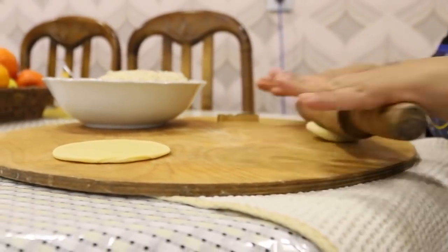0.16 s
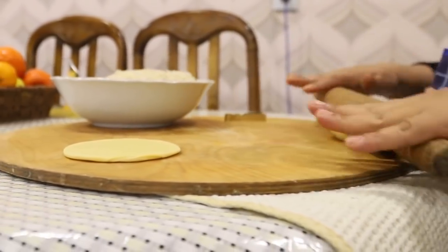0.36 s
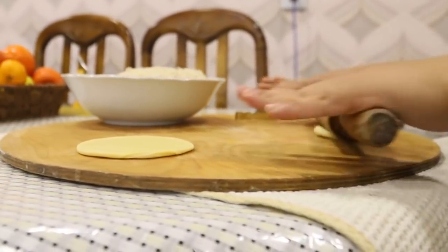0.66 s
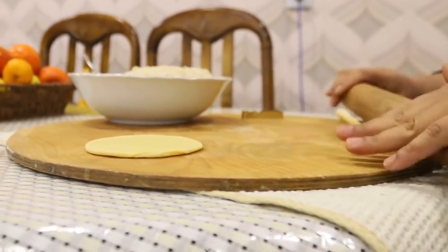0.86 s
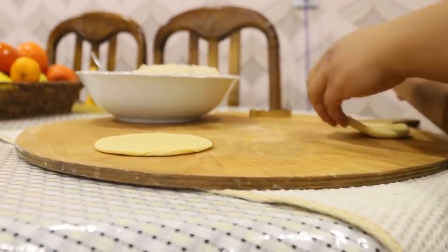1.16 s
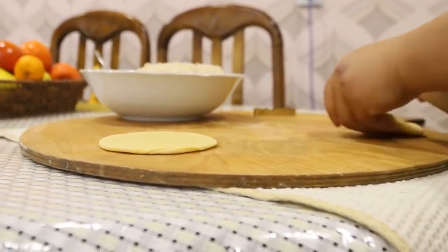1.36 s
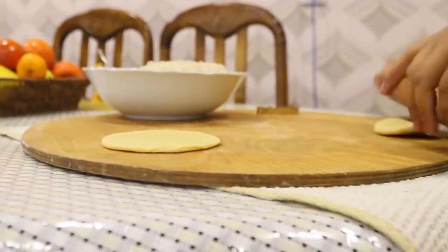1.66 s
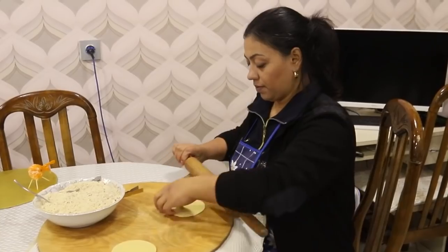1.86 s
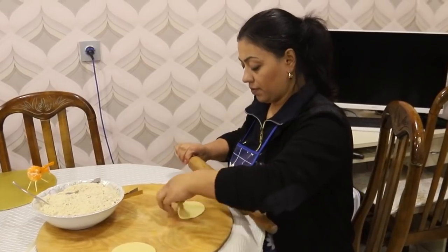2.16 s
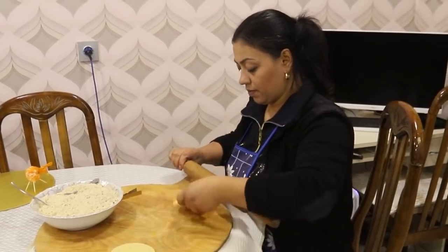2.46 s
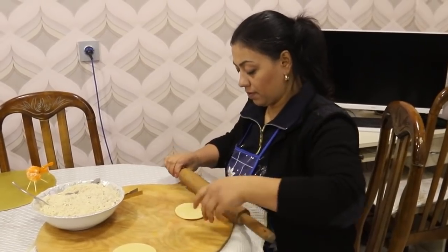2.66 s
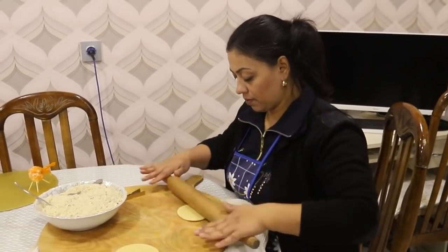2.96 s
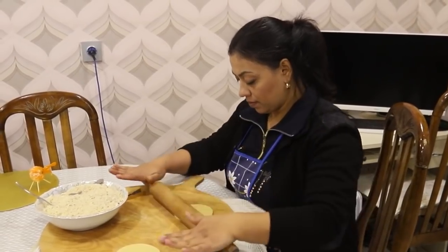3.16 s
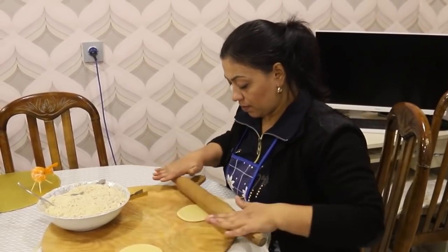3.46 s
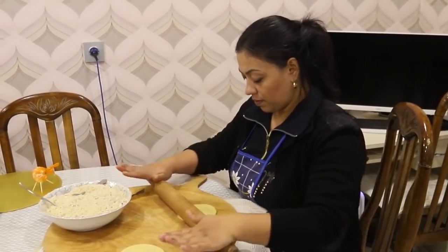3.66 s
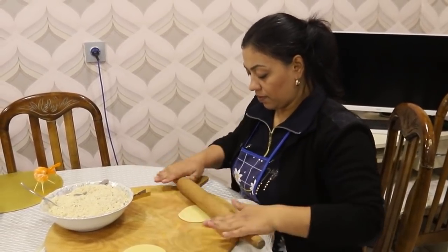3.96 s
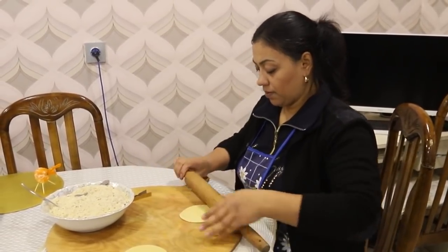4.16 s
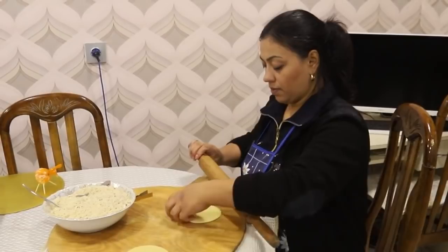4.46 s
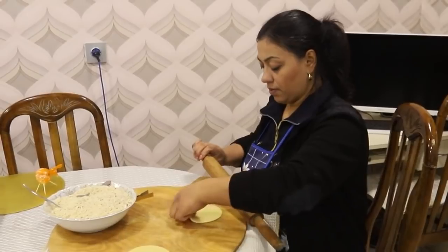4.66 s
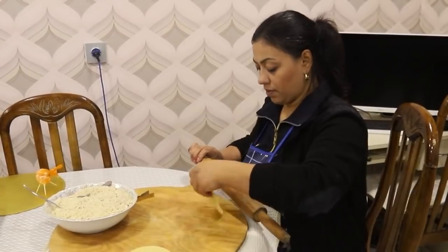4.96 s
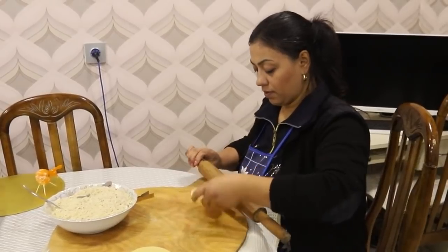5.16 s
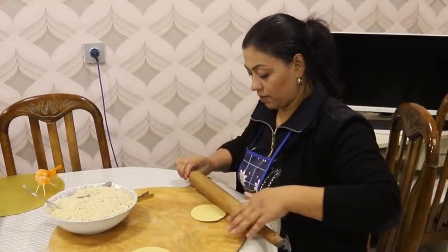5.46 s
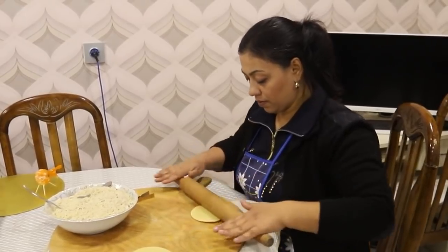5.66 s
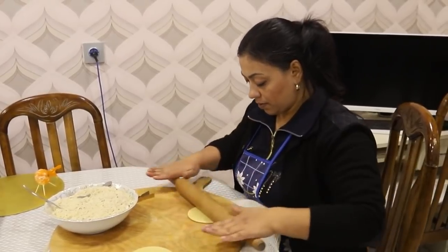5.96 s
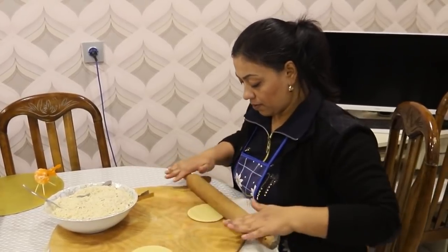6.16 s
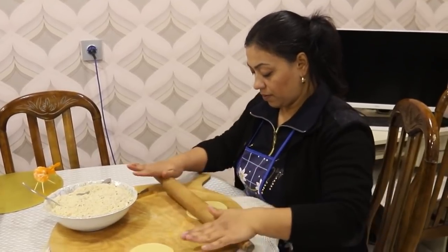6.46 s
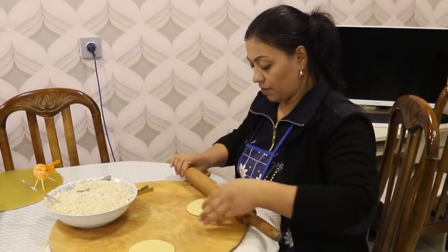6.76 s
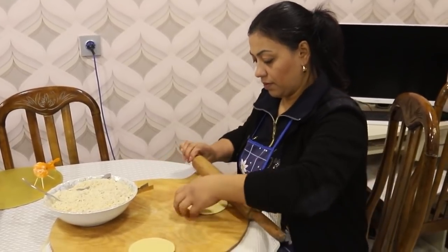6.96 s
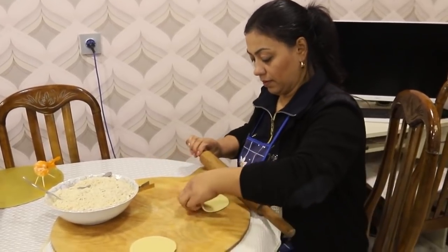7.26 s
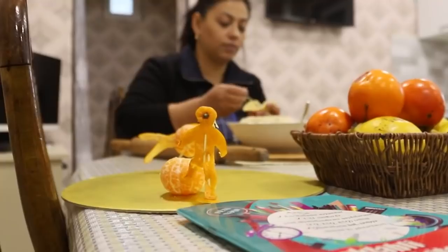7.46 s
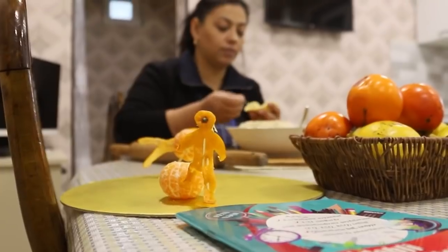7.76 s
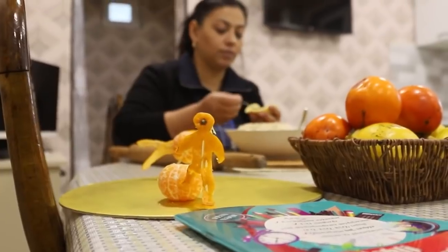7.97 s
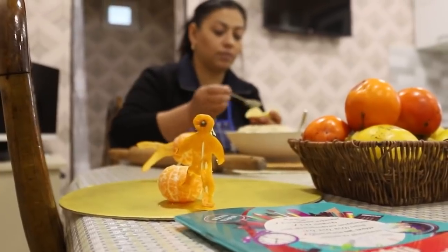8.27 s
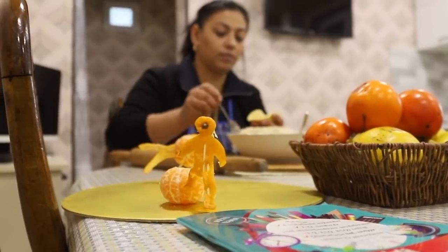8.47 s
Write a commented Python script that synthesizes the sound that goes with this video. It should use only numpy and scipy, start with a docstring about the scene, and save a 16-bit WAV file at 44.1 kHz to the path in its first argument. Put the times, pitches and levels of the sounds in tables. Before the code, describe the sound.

Quiet room tone with a faint wavering appliance hum and a thin, very high whine opens the sound. Close to a wooden board, a rolling pin gives hard, short woody clacks at about 0.6, 0.7, 0.9 and 1.1 s, the stronger ones touching off a faint high crockery ring. A tiny dropout falls near 1.75 s; then the microphone is further off in a small live room with a short reverberation. Soft floury slides come at 2 s, a quick double knock at 2.6, another at 2.85, then scuffs and dry ticks around 3 to 3.3. Knocks follow at 4.3, fainter at 4.75, a rapid pair at 5.35, then 5.6, 6.3 and a strong one at 6.9. Dry bright rustles brush by at 4.3 and 7.2, with gritty slides near 7. After another brief dropout at 7.5, only a very faint thump, small light ticks, hum and a low soft rumble near 8 remain until about 8.7 s.

```python
"""A faint hum and a thin whine over room tone are heard first; then a wooden rolling pin knocks on a round board.
The board lies on a cloth-covered table in a small, live dining room: each blow excites damped modes and a crack.
Crockery rings in its modes; dry rustles are dense small clicks in broad bands; slides on flour are friction noise,
with a low rumble near 8 s. Light dry ticks are short rings with a snap. The listening point starts by the board
and later stands further off, where a near wall returns each knock once. The sound drops out briefly twice."""
import sys
import numpy as np
from scipy import signal
from scipy.fft import rfft, irfft, next_fast_len
from scipy.io import wavfile
from scipy.ndimage import uniform_filter1d

SR = 44100
rng = np.random.default_rng(int(sys.argv[2]) if len(sys.argv) > 2 else 0)


def store_wav(level_fs):
    """Save 16-bit WAV to argv[1]."""
    pcm = np.round(np.clip(np.atleast_2d(level_fs), -1, 1) * 32767)
    wavfile.write(sys.argv[1], SR, pcm.T.astype(np.int16))


N = 379789
OPPOSED = np.array([[1], [-1]])  # a side signal enters left and right with opposite signs
SOFT_MS = 0.4  # rise time of short noise bursts
CLOSE_UNTIL_S = 1.75  # the listening point is by the board, later further off


def undb(db):
    """Decibel law: the amplitude ratio of a level."""
    return 10 ** (np.asarray(db) / 20)


def level(x, db):
    """Root-mean-square scaling: bring a signal to a level in dB."""
    return x * undb(db) / np.sqrt(np.mean(x ** 2))


def coloured(gain, size):
    """Spectral shaping: white noise filtered by gain(f/Hz)."""
    fast = next_fast_len(size)
    hz = np.maximum(np.arange(fast // 2 + 1) * SR / fast, 1)
    return irfft(rfft(rng.standard_normal(fast)) * gain(hz), fast)[:size]


def bump(centre_hz, octaves):
    """Constant relative bandwidth: a bell-shaped band on a log-frequency axis."""
    return lambda hz: np.exp(-0.5 * (np.log2(hz / centre_hz) / octaves) ** 2)


def walk(rate):
    """Slow random modulation: random levels held 1 / rate s and smoothed twice."""
    hold = int(SR / rate)
    steps = np.repeat(rng.standard_normal(N // hold + 1), hold)
    return uniform_filter1d(uniform_filter1d(steps, hold), hold)[:N]


def decay(t, t60):
    """Exponential decay: the amplitude falls 60 dB in t60 seconds."""
    return undb(-60 * t / t60)


def add(out, x, s, pan_db=0):
    """Superposition: add a sound at s seconds, the left louder than the right by pan_db."""
    start = int(s * SR)
    x = x[..., :N - start]
    out[:, start:start + x.shape[-1]] += x * undb(OPPOSED * pan_db / 2)


def ring(modes, lift_db=0):
    """Modal vibration: damped modes, one row each; every blow lands elsewhere, so strength and pitch vary."""
    hz, db, t60 = np.transpose(modes)[:, :, None]
    t = np.arange(SR // 3) / SR
    strength, detune = rng.standard_normal((2, len(modes), 1))
    scatter_db, scatter_pitch = 1.5, 0.015
    envelope = undb(db + lift_db + scatter_db * strength) * decay(t, t60)
    return envelope * np.sin(2 * np.pi * hz * (1 + scatter_pitch * detune) * t)


def clatter(crack_db):
    """Granular noise: a knock shakes loose grain and flour, a burst set relative to the crack."""
    t = np.arange(SR // 10) / SR
    grains = level(coloured(bump(1900, 0.72), len(t)), crack_db - 47)
    return grains * decay(t, 0.034) * np.minimum(t * 1000 / SOFT_MS, 1) ** 2


# pin meets board in two close pulses: (t/s, direct peak level/dB, first against second/dB, second late/ms,
# contact time constant/ms, crack level/dB, wood tilt/dB per octave, favoured f/Hz, table thud level/dB)
KNOCKS = [(0.588, -4.5, 5, 5.2, 0.064, 26.5, -1.5, 880, -26),
          (0.7273, -18.5, -5.5, 4.1, 0.074, 14, -1, 323, -16.5),
          (0.9274, -3, -8.5, 2.15, 0.065, 24.5, 4, 770, -20),
          (1.105, -6.5, -21, 1.9, 0.084, 26.5, 4, 845, -15),
          (1.769, -26.5, 1, 1.54, 0.17, 20, 3.5, 530, -15),
          (2.6175, -15, 8, 2.3, 0.029, 40, 5.5, 1680, -20),
          (2.649, -24, 22, 2.8, 0.059, 14, 3.5, 1470, -28),
          (2.847, -13.5, -6.5, 1.68, 0.052, 31.5, 2, 640, -6.5),
          (3.4782, -28, -4, 4.2, 0.13, 21, -3, 402, -3), (4.261, -10, -4, 1.75, 0.059, 32, 3, 610, -9.5),
          (4.7505, -30, 8, 1.9, 0.13, 27, -1.5, 302, 0), (5.3425, -21.5, -6, 2.3, 0.011, 39, 4, 1480, -31),
          (5.3555, -16, 1.5, 3.3, 0.015, 33.5, 2, 640, -32),
          (5.574, -12, -4.5, 1.69, 0.047, 31.5, 1, 625, -5.5),
          (5.868, -41.5, -20, 3.8, 0.16, 24, 6, 280, 20),
          (6.2667, -20.5, -5, 1.53, 0.084, 18, 2.5, 665, -10),
          (6.8998, -7, -7.5, 1.63, 0.06, 39.5, 4, 590, -9), (7.507, -41.5, 15, 2.1, 0.17, 34, -6, 280, -8)]
# modes of pin and board: (f/Hz, relative level/dB, t60/s)
WOOD_MODES = [(280, 0.5, 0.019), (405, -6, 0.058), (530, 6.5, 0.01), (623, 8.5, 0.013), (781, 6, 0.028),
              (820, 7.5, 0.016), (940, -2.5, 0.039), (1186, 3, 0.014), (1370, 7.5, 0.0097),
              (1576, 3.5, 0.015), (1843, 4.5, 0.0062), (2047, 4, 0.0096), (2480, 7.5, 0.002),
              (2780, -18, 0.0031), (3100, -13, 0.0032), (3530, -6, 0.0031), (4260, -14, 0.0023)]
# modes of the table: (f/Hz, relative level/dB, t60/s)
TABLE_MODES = [(62, -19, 0.36), (89.5, -14, 0.53), (138.4, 2, 0.095), (166.3, -1, 0.12), (188, -0.5, 0.058),
               (248.4, -6, 0.16)]


def knocks():
    """Impact excitation: smooth pulses ring wood and table; a softer contact pushes longer and sounds duller.

    Returns the direct sound, and the evener blend of all directions that fills the room."""
    direct, around = np.zeros((2, 2, N))
    ms = np.arange(SR // 40) / SR * 1000
    # the pin stopping short cracks the air directly; its thickness rounds off the top
    crack_lowpass = signal.butter(3, 4470, fs=SR, output="sos")
    crack = np.gradient(signal.sosfilt(crack_lowpass, np.arange(SR // 3) == 1))
    # pairs of modes push the air in opposite ways
    signs = (-1.) ** ((np.arange(len(TABLE_MODES) + len(WOOD_MODES)) + 1) // 2)
    wood_hz = np.array(WOOD_MODES)[:, :1]
    for s, db, first_db, lag_ms, contact_ms, crack_db, tilt_db, favoured_hz, thud_db in KNOCKS:
        first_time = ms / contact_ms
        second_time = np.maximum(ms - lag_ms, 0) / contact_ms
        first = undb(first_db) * first_time ** 3 * np.exp(-first_time)
        push = first + second_time ** 3 * np.exp(-second_time)
        # the place of the blow favours the modes near one pitch
        lift_db = 3.7 * bump(favoured_hz, 0.35)(wood_hz) + tilt_db * np.log2(wood_hz / favoured_hz)
        modes = np.vstack([undb(thud_db) * ring(TABLE_MODES), ring(WOOD_MODES, lift_db)])
        loud_crack = undb(crack_db) * crack
        blow = signal.fftconvolve(-signs @ modes + loud_crack, push)
        # without the dips between modes and between the two pulses
        even_modes = modes[::2].sum(axis=0) - modes[1::2].sum(axis=0)
        even = signal.fftconvolve(even_modes + loud_crack, first * np.hypot(1, undb(-first_db)))
        grains = clatter(crack_db) * push.sum()
        blow[:len(grains)] += grains
        even[:len(grains)] += grains
        gain = undb(db) / np.abs(blow).max()
        add(direct, blow * gain, s)
        add(around, even * gain, s)
    return direct, around[0]


# modes of crockery on the table: (f/Hz, relative level/dB, t60/s)
BOWL_MODES = [(4620, 0, .16), (6050, -4, .03)]
# two hard knocks set it ringing: (t/s, level/dB)
CLINKS = [(.934, -44), (1.11, -58)]


def clinks():
    """Free vibration: crockery rings on in its own damped modes."""
    out = np.zeros((2, N))
    for s, db in CLINKS:
        add(out, undb(db) * ring(BOWL_MODES).sum(axis=0), s)
    return out


# dry, bright rustles: (t/s, swell/s, fade time constant/s, level before swell and fade/dB, tilt/dB per octave)
RUSTLES = [(4.309, 0.0081, 0.048, -38.5, -0.5), (7.226, 0.0066, 0.036, -35.5, 0.5)]
# broad bands of the rustle: (f/Hz, width/Hz, relative level/dB)
RUSTLE_BANDS = [(1680, 50, 13.5), (2900, 1800, 2), (4560, 520, -7), (7140, 1600, -10.5), (12200, 3000, -41)]


def rustles():
    """Stochastic excitation: dense, uneven small clicks fill broad bands, swell quickly and die away."""
    clicks_per_s, scatter_db = 5000, 2.5
    out, t = np.zeros(N), np.arange(SR // 3) / SR
    hz, width, band_db = np.transpose(RUSTLE_BANDS)[:, :, None]
    for s, swell, fade, db, tilt_db in RUSTLES:
        hit, size = rng.random((2, len(t)))
        strength = undb(-scatter_db * np.log(size))
        sign = np.sign(hit * SR - clicks_per_s / 2)
        clicks = (hit < clicks_per_s / SR) * strength * sign
        gain = undb(band_db + tilt_db * np.log2(hz / 2000)) * width
        bands = gain * np.exp(-np.pi * width * t) * np.sin(2 * np.pi * hz * t)
        shape = np.minimum(t / swell, 1) * np.exp(-np.maximum(t - swell, 0) / fade)
        rustle = level(signal.fftconvolve(clicks, bands.sum(axis=0))[:len(t)], db)
        start = int(s * SR)
        out[start:start + len(t)] += rustle * shape
    return out


# slides on flour and, near 8 s, a low rumble:
# (t/s, swell/s, fade time constant/s, level before swell and fade/dB, centre f/Hz)
SCUFFS = [(0.968, 0.034, 0.14, -53.5, 6100), (1.4, .05, 0.082, -59, 6200), (1.999, 0.04, 0.071, -44, 980),
          (2.15, 0.027, 0.031, -49.5, 500), (2.93, 0.065, 0.022, -38.5, 560),
          (3.115, 0.071, 0.0064, -38.5, 610), (3.498, 0.012, 0.026, -54, 232),
          (4.177, 0.046, 0.045, -47.5, 3700), (4.304, 0.011, 0.032, -43.5, 3600),
          (4.547, 0.097, 0.043, -47, 1850), (4.662, 0.014, 0.043, -44, 200), (4.89, .04, 0.28, -60, 4840),
          (5.84, 0.027, 0.024, -45, 206), (5.93, 0.03, 0.031, -54, 218), (6.591, 0.024, 0.032, -53.5, 1600),
          (6.805, 0.023, 0.064, -48, 3270), (7.046, 0.038, 0.12, -43.5, 2900),
          (7.059, 0.034, 0.09, -39, 810), (7.21, 0.011, 0.088, -47, 497), (7.899, 0.16, 0.18, -57, 65)]


def scuffs_and_rumble():
    """Band noise: gritty friction, and one low rumble, swell and then die, wider in the treble."""
    out = np.zeros((2, N))
    t = np.arange(SR * 2 // 3) / SR
    for s, swell, fade, db, hz in SCUFFS:
        shape = np.where(t < swell, (t / swell) ** 0.5, np.exp(-np.maximum(t - swell, 0) / fade))
        grit = undb(2.0 * walk(500)[:len(t)])
        octaves = 0.35 if hz < 100 else 0.83  # the rumble is a narrower band
        mid, side = (level(coloured(bump(hz, octaves), len(t)), 0) for _ in range(2))
        both = (mid + min(hz / 1440, 0.9) * side * OPPOSED) * grit
        add(out, level(both, db) * shape, s)
    return out


# light dry ticks, many at the pitches of the appliance hum:
# (t/s, ring level/dB, f/Hz, treble snap relative level/dB)
TICKS = [(.442, -46, 2940, -16), (1.428, -48, 1920, -20), (2.906, -48, 3450, -3), (3.0008, -37.5, 730, -6),
         (3.073, -37.5, 960, -7), (3.1785, -39, 780, 0), (3.2007, -45.5, 2440, -20),
         (3.3039, -45.5, 2340, -20), (4.3115, -49, 4530, -1), (4.906, -52, 4600, -15),
         (5.163, -50, 2450, -10), (5.2455, -57, 2370, -15), (5.684, -46, 3070, -10),
         (7.655, -43, 1350, -20), (7.713, -44, 1380, -12), (7.908, -64, 2700, -20), (8.04, -57, 2430, -22),
         (8.404, -51, 1350, -15), (7.6873, -47, 2700, -20), (7.7552, -45, 2430, -17),
         (7.7844, -46, 2700, -20), (7.8466, -44, 2730, -15), (8.0796, -49, 2700, -18),
         (8.112, -47, 2640, -15), (8.185, -51, 2430, -18), (8.572, -47, 2280, -20)]
# faint ticks ring at one of these: f/Hz
FAINT_HZ = [1340, 1350, 2430, 2700]


def ticks():
    """Transient radiation: a short damped ring with a wider snap; faint ones fall at random times."""
    out, t = np.zeros((2, N)), np.arange(SR // 50) / SR
    faint_count = 80
    at, size, pitch = rng.random((faint_count, 3)).T
    faint_hz = np.take(FAINT_HZ, (pitch * len(FAINT_HZ)).astype(int))
    faint_db = -48 + 6.9 * np.log(size)
    faint = np.transpose([at * N / SR, faint_db, faint_hz, np.full(faint_count, -20.)])
    for s, db, hz, treble_db in [*TICKS, *faint]:
        tone = decay(t, 0.033) * np.sin(2 * np.pi * hz * t)
        body = level(coloured(bump(hz, 0.74), len(t)), 0)
        body = body * decay(t, 0.021) * np.minimum(t / 0.00047, 1)
        treble = level(coloured(bump(8300, 0.31), len(t)), treble_db)
        treble = treble * decay(t, 0.0063) * np.minimum(t * 1000 / SOFT_MS, 1)
        add(out, undb(db) * (tone + body + treble), s, pan_db=-2.5)
    return out


# reverberation bands: (centre f/Hz, t60/s, relative level/dB)
ROOM_BANDS = [(70.6, 0.33, -16), (257, 0.36, -11.5), (530, 0.4, -9.5), (1600, 0.45, -8.5),
              (2150, 0.48, -13), (4530, 0.5, -7), (8000, 0.29, -3)]


def room(x):
    """Reverberation: uneven echoes thicken into a wash that dies band by band; early echoes and bass are central."""
    t, tail = np.arange(int(0.7 * SR)) / SR, 0
    steps = np.repeat(rng.standard_normal(len(t) // 44 + 1), 44)[:len(t)]
    sparse = undb(5.0 * np.exp(-t / 0.033) * steps)  # dB spread, evening out with time
    sparse /= np.sqrt(uniform_filter1d(sparse ** 2, size=900))
    for hz, t60, db in ROOM_BANDS:
        mid, side = (level(coloured(bump(hz, 0.79), len(t)), db - 32) for _ in range(2))
        width = min((hz / 1830) ** 0.97, 1) * (1 - np.exp(-t / 0.0013))
        tail = tail + (mid + width * side * OPPOSED) * decay(t, t60)
    onset = np.clip((t - 0.003) / 0.00027, 0, 1)
    return signal.fftconvolve(x[None], tail * sparse * onset, axes=1)[:, :N]


# spectrum of the central room tone: (f/Hz, relative level/dB per Hz)
AIR_MID = [(15, -47), (25, -9.5), (142, 2), (436, -2.5), (554, -1), (1110, -6), (1370, -1.5), (1570, -6.5),
           (2160, -7.5), (2410, -9.5), (2980, -10.5), (9400, -22.5), (14800, -31.5)]
# spectrum of the room tone's left-right difference: (f/Hz, relative level/dB per Hz)
AIR_SIDE = [(15, -44), (25, -14), (109, -8), (242, -5.5), (971, -9), (1200, -10.5), (1890, -10.5),
            (2470, -10.5), (9910, -26), (13300, -32.5), (14800, -32)]
# wavering bands of an appliance: (f/Hz, width/Hz, level before wavering/dB)
HUM = [(209, 52, -66), (538, 38, -69), (1382, 57, -65), (2430, 150, -67), (2700, 37, -80.5),
       (3450, 34, -81)]


def air():
    """Broadband background: shaped room tone with the narrow, wavering bands of an appliance."""
    def shaped(points):
        hz, db = np.transpose(points)
        return coloured(lambda f: undb(np.interp(np.log(f), np.log(hz), db)), N)

    def hum_band(hz, width, db):
        resonance = coloured(lambda f: 1 / (1 + (2 * (f - hz) / width) ** 2), N)
        return level(resonance, db) * undb(7.6 * walk(35))

    mid, side = level(shaped(AIR_MID), -51.5), level(shaped(AIR_SIDE), -53.5)
    for hz, width, db in HUM:
        mid = mid + hum_band(hz, width, db)
        side = side + min(hz / 2400, 1) * hum_band(hz, width, db)
    return (mid + side * OPPOSED) * undb(1.0 * walk(2.4))


# whine at each place in the room: (until t/s, left level/dB, right level/dB, right leads/rad)
WHINE = [(1.75, -71.5, -65, 2.), (7.5, -69, -64.5, 2.4), (9, -67.5, -75, 1.1)]


def whine():
    """Standing waves: a thin steady tone whose strength and phase at each channel depend on the place."""
    t = np.arange(N) / SR
    until, left_db, right_db, lead = np.transpose(WHINE)
    place = np.searchsorted(until, t)
    phase = 2 * np.pi * 15665 * t
    left = undb(left_db[place]) * np.sin(phase)
    right = undb(right_db[place]) * np.sin(phase + lead[place])
    return np.array([left, right])


def scene():
    """Superposition: direct sounds, their reverberation and the background."""
    (pin, around), small, rustle = knocks(), ticks(), rustles()
    close = np.arange(N) / SR < CLOSE_UNTIL_S
    # by the board the first echoes come 5 ms later and the room is weaker
    late = np.roll(around, int(5 * SR / 1000))
    knock_send = undb(np.where(close, -2.5, 1)) * np.where(close, late, around)
    # further off, a near wall throws each knock back once, 5.2 ms later
    slap = undb(-8) * np.roll(pin, int(5.2 * SR / 1000), axis=1) * ~close
    wash = room(undb(-5.5) * rustle + knock_send + undb(-12.5) * small.mean(axis=0))
    hits = pin + slap + clinks() + small + rustle + wash
    # small bodies radiate little deep bass
    bass_cut = signal.butter(2, 90, "high", fs=SR, output="sos")
    return signal.sosfilt(bass_cut, hits) + scuffs_and_rumble() + air() + whine()


# intervals of silence: (from t/s, to t/s)
GAPS = [(1.736, 1.769), (7.486, 7.507)]


def record(dry):
    """Band limiting: bass leans left and treble right, two short silences are cut, the top is removed."""
    low = signal.sosfilt(signal.butter(1, 800, fs=SR, output="sos"), dry)
    lean = undb(0.5 * OPPOSED / 2)  # 0.5 dB between the channels
    t, gate = np.arange(N) / SR, np.ones(N)
    for start, end in GAPS:
        gate[(t > start) & (t < end)] = 0
    heard = (low * lean + (dry - low) / lean) * uniform_filter1d(gate, size=22)
    top_cut = signal.ellip(10, 0.2, 80, 15900, fs=SR, output="sos")
    return signal.sosfilt(top_cut, heard)


dry = scene()
out = record(dry)
store_wav(out)
```